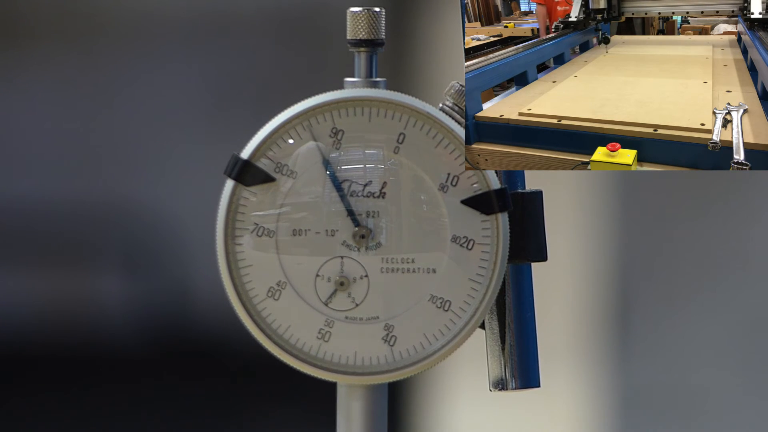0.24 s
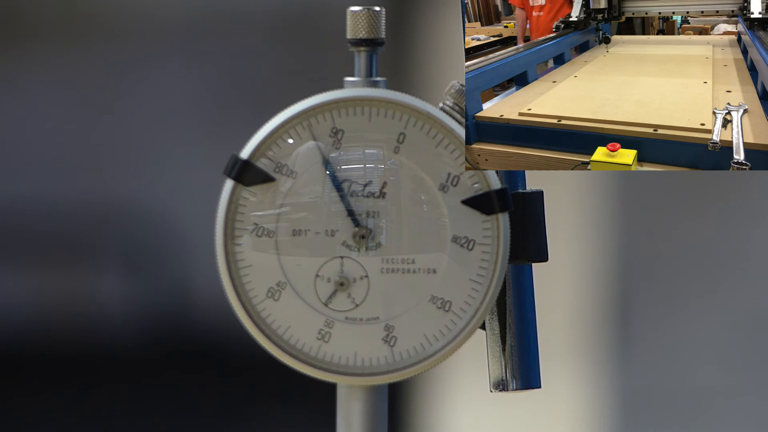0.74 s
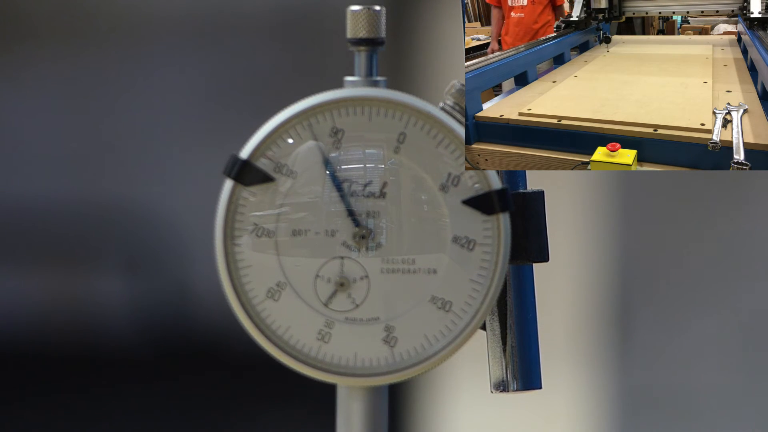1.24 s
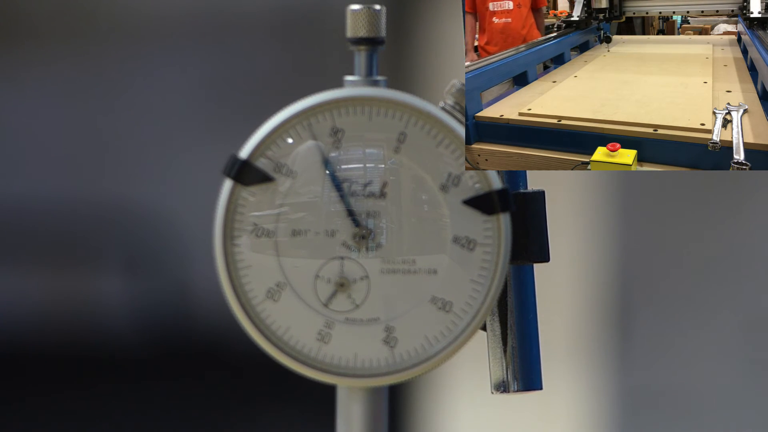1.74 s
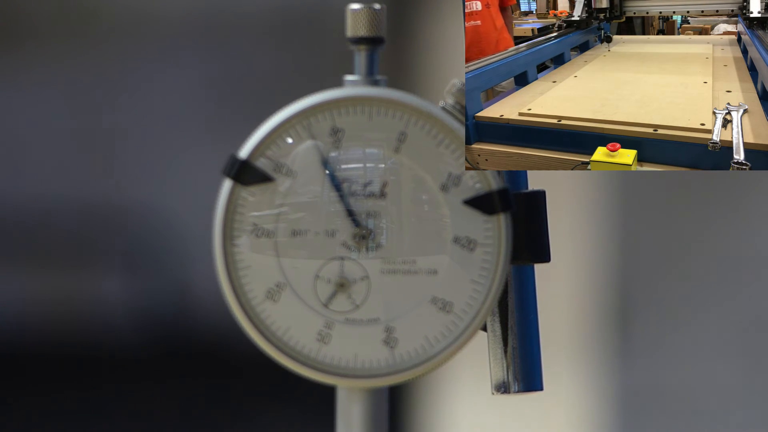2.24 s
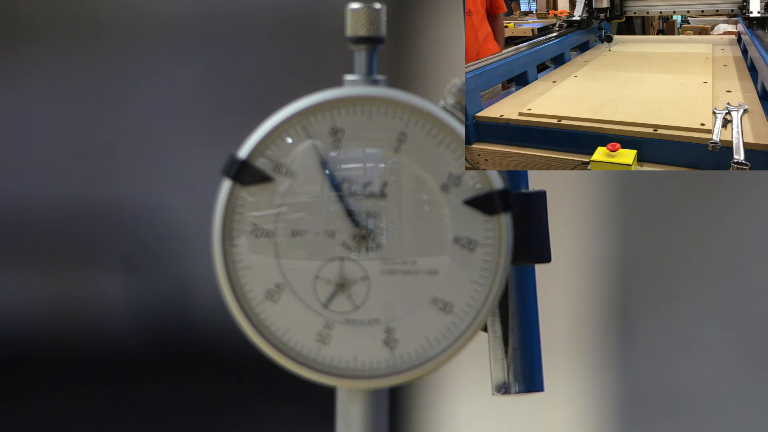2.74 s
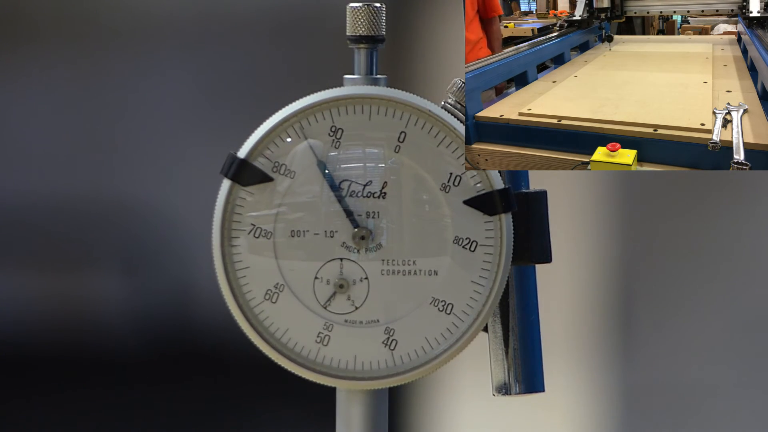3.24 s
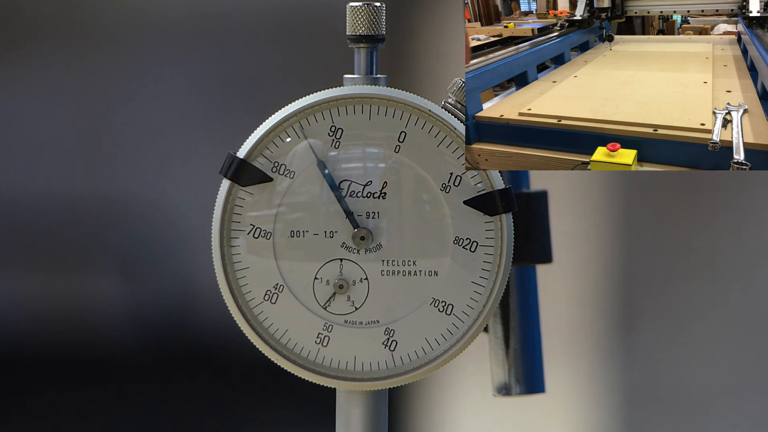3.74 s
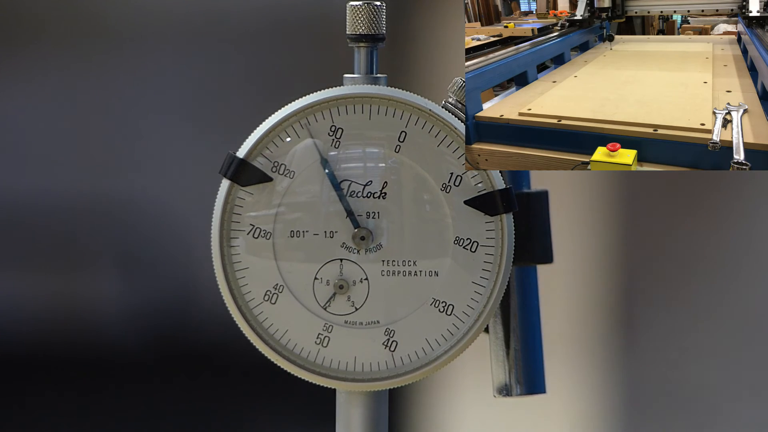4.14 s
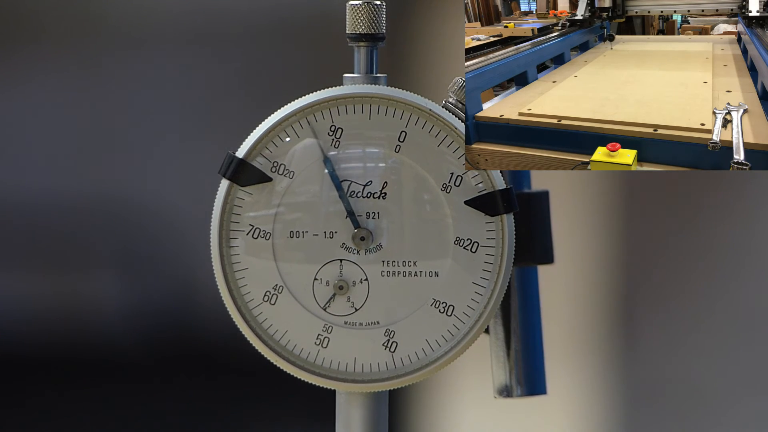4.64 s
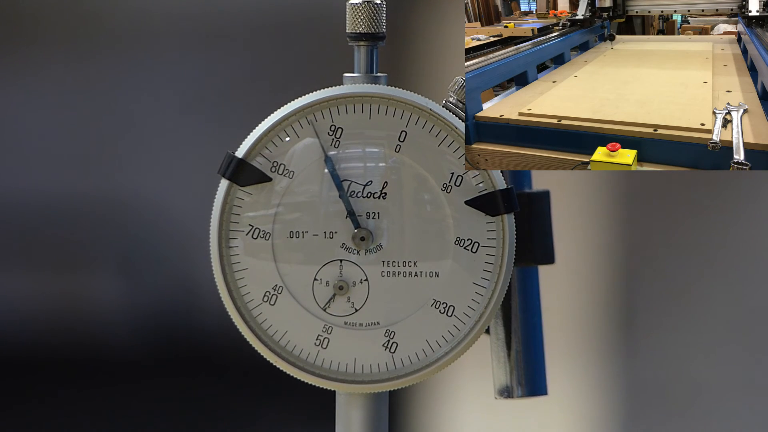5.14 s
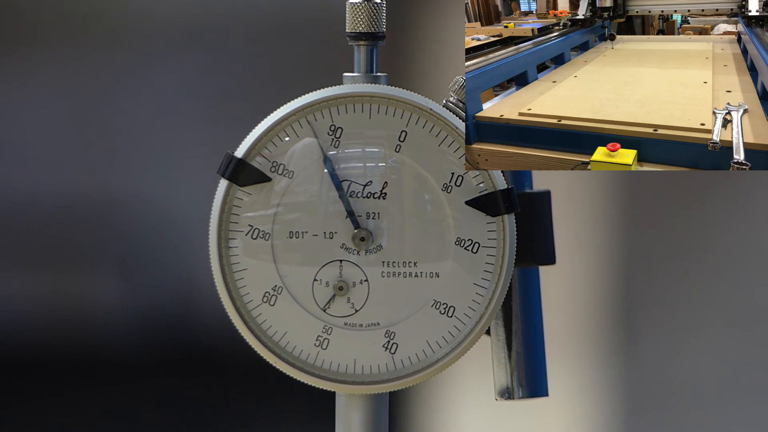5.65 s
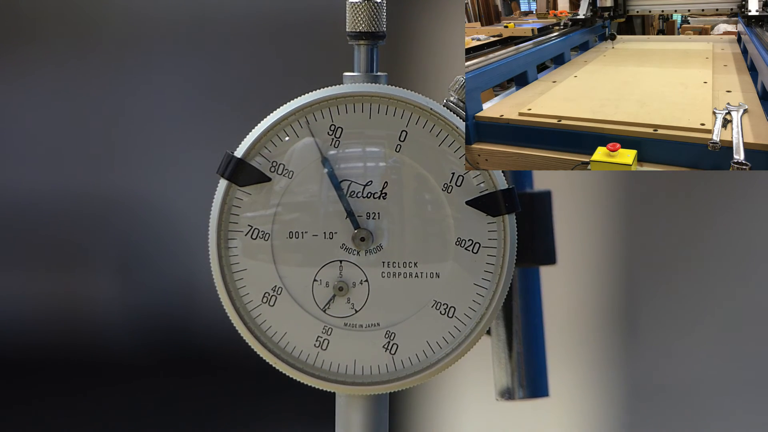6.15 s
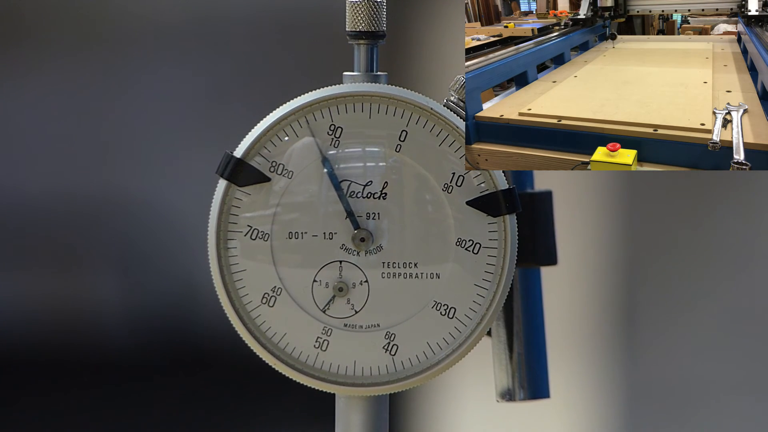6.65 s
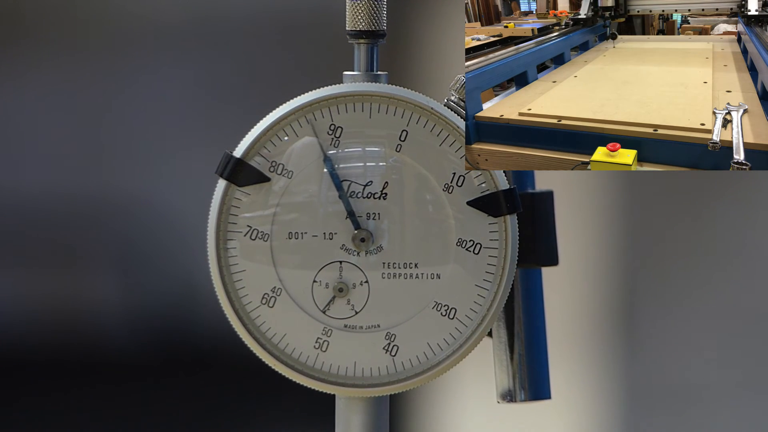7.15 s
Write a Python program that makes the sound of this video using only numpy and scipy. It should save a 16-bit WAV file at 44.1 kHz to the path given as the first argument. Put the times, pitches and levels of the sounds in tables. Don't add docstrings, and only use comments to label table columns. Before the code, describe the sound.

Close to a small camera microphone, electric drive motors hold a low, buzzing hum that throbs quickly and swells irregularly. Gear and belt whine and bearing rumble surround it. Soft ticks come early, then a tiny metal ping; later a second, higher motor tone fades in, and clearer dull ticks land near the end. Faint hiss and a very high thin whine sit mostly on the right.

```python
import sys
import numpy as np
from scipy import signal
from scipy.fft import rfft, irfft, next_fast_len
from scipy.io import wavfile
from scipy.ndimage import uniform_filter1d

SR = 44100
rng = np.random.default_rng(int(sys.argv[2]) if len(sys.argv) > 2 else 0)


def put_to_file(sound):
    columns = np.atleast_2d(sound).T
    safe = np.clip(columns, -1, 1)
    whole_steps = np.round(safe * 32767)
    wavfile.write(sys.argv[1], SR, whole_steps.astype(np.int16))


def decibels_to_gain(level_db):
    exponent = np.asarray(level_db, float) / 20
    return 10 ** exponent


N = 325899

# start_s [s], level_db [dB rms]
SECOND_DRIVE = [
    (3.6, -60),
    (4.05, -45),
    (4.5, -45),
    (4.9, -40),
    (5.6, -36),
    (6.1, -36.5),
    (6.6, -40.5),
    (7.0, -40.5),
    (7.39, -38.5),
]


def read(points, hz):
    f, value = np.transpose(points)
    return np.interp(np.log(hz + 1), np.log(f + 1), value)


def follow(rows):
    s, db = np.transpose(rows)
    return decibels_to_gain(np.interp(np.arange(N) / SR, s, db))


def coloured(gain, length):
    size = next_fast_len(length)
    spectrum = rfft(rng.standard_normal(size)) * gain(np.fft.rfftfreq(size, 1 / SR))
    return irfft(spectrum, size)[:length]


def drift(hz):
    x = coloured(lambda f: 1 / (1 + (f / hz) ** 2), N)
    return x / x.std()


def tone(hz, db, wander=0., waver_db=0.):
    phase = 2 * np.pi * (hz * np.arange(N) / SR + rng.random()) + wander * drift(hz=1.9)
    return np.sqrt(2) * decibels_to_gain(db + waver_db * drift(hz=0.41)) * np.cos(phase)


def motors():
    # start_s [s], level_db [dB rms]
    load_curve = [(0, -18), (.22, -17), (.55, -19.5), (1.0, -17.5), (1.25, -16.5), (1.75, -17), (2.2, -19),
                  (2.5, -19.5), (2.75, -15), (3.0, -18.5), (3.4, -19), (3.75, -21), (4.0, -16.5),
                  (4.6, -18.5), (5.2, -16), (5.45, -18.5), (6.5, -20), (7.39, -19.5)]
    # apart_hz [Hz], level_db [dB re order],
    # in_step_s [s], swell_share [share of the second drive's swell]
    fourth_beats = [(10.61, -19.5, .053, .3), (15.42, -24, .015, 0)]
    eighth_beats = [(-10.04, -3, .062, .25), (7.11, -7, .072, 0), (-5.28, -9.5, .088, 0),
                    (19.57, -15, .028, 0)]
    other_orders = [2, 3, 6, 7, 10, 12, 15, 16, 20]
    other_orders_db = [-51, -41, -50, -51, -54, -50, -59, -48, -63]
    shaft_hz = 42.557

    load = follow(load_curve)
    fourth = load * throbbing(4 * shaft_hz, fourth_beats, share=0.29, width_hz=25.8, smooth_s=0.16)
    eighth_gain = decibels_to_gain(-36) * (load / np.median(load)) ** 0.13
    eighth = eighth_gain * throbbing(8 * shaft_hz, eighth_beats, share=0.64, width_hz=29, smooth_s=0.24)
    steady = sum(tone(k * shaft_hz, db, wander=.1, waver_db=.8)
                 for k, db in zip(other_orders, other_orders_db))
    return fourth + eighth + steady


def throbbing(hz, beats, share, width_hz, smooth_s):
    t = np.arange(N) / SR
    ring = [coloured(lambda f: (1 + (2 * f / width_hz) ** 2) ** -1.05, N) for _ in range(2)]
    swing = 1 + share * (ring[0] + 1j * ring[1]) / np.std(ring)
    smooth = round(smooth_s * SR)
    power = uniform_filter1d(uniform_filter1d(abs(swing) ** 2, smooth), smooth)
    slow = np.sqrt(abs(power))
    second = follow(SECOND_DRIVE)
    swell = second / second.max()
    near = sum(decibels_to_gain(db) * swell ** part * np.exp(2j * np.pi * apart * (t - s))
               for apart, db, s, part in beats) / np.median(slow)
    return np.sqrt(2) * ((swing / slow + near) * np.exp(2j * np.pi * hz * t)).real


def second_drive():
    return follow(SECOND_DRIVE) * tone(427.98, 0., wander=.12, waver_db=0.8)


def gears():
    gear_pitches = [136.16, 492.25, 516.0, 525.47, 623.07, 670.63, 723.5, 758.5, 831.09, 844.0, 943.99,
                    964.1, 984.57, 1274.46, 2013.19, 2023.8]
    gear_levels = [-45, -52, -56, -55, -52, -56, -60, -54, -57, -66, -64, -57.5, -63, -65, -73, -72]
    return sum(tone(hz, db, wander=.2, waver_db=1.4) for hz, db in zip(gear_pitches, gear_levels))


def frame():
    # pitch_hz [Hz], level_db [dB per Hz]
    rumble = [(25, -67), (50, -56.5), (68, -61), (95, -48.5), (170, -50.5), (280, -50.5), (400, -55.5),
              (560, -59.5), (800, -63), (1100, -68), (2000, -69), (3900, -69.5), (4400, -75.5), (6500, -82),
              (14500, -86)]
    # pitch_hz [Hz], width_hz [Hz], level_db [dB per Hz at the top]
    resonances = [(131, 22, -51.5), (186.3, 47, -41), (224, 27, -51), (252, 18, -48), (308.6, 11.4, -43.5),
                  (344, 25, -69), (431.6, 36, -51.5), (498, 23, -55), (606, 40, -53), (667, 60, -55),
                  (748, 31, -55.5), (856, 40, -65), (974, 64, -61), (716, 16, -55.5), (486, 9.3, -50.5),
                  (2350, 23, -72), (1275, 340, -68), (3144, 320, -67.5), (3615, 26, -60), (3710, 360, -70)]

    def body(hz):
        peaks = sum(decibels_to_gain(db) ** 2 / (1 + (2 * (hz - f) / w) ** 2) ** 1.57 for f, w, db in resonances)
        return np.sqrt(decibels_to_gain(read(rumble, hz)) ** 2 + peaks) / (1 + (hz / 15100) ** 60)

    low = coloured(lambda hz: body(hz) / np.sqrt(1 + (hz / 900) ** 4), N)
    high = coloured(lambda hz: body(hz) / np.sqrt(1 + (900 / (hz + 1)) ** 4), N)
    sway_db = 0.31 * drift(hz=0.86)
    flicker_db = .5 * drift(hz=5.5) + 0.46 * drift(hz=25)
    return decibels_to_gain(32) * (low * decibels_to_gain(sway_db) + high * decibels_to_gain(flicker_db))


def ticks():
    # start_s [s], level_db [peak dB], pitch_hz [centre Hz],
    # rise_s [s], t60_s [s]
    rail_ticks = [(.85, -55, 7000, .008, .1), (1.07, -48.5, 5500, .008, .1),
                  (3.066, -47.5, 6500, .005, .12), (1.21, -41, 1000, .001, .06),
                  (4.325, -33.5, 1200, .005, .11), (4.35, -50, 7000, .02, .2), (4.39, -47, 3600, .02, .25),
                  (5.4, -31.5, 1250, .01, .18), (5.39, -49, 6000, .015, .2),
                  (7.143, -29.5, 1300, .001, .14), (7.149, -40, 3400, .003, .13),
                  (7.178, -38, 1300, .004, .22), (7.232, -39, 2600, .012, .18)]
    out, t = np.zeros(N + SR), np.arange(SR // 2) / SR
    for s, db, hz, rise, t60 in rail_ticks:
        def colour(f):
            climb = (f / hz) ** 3
            fall = decibels_to_gain(7.5 * np.log2((f + 1) / hz))
            return climb / (1 + climb * fall) * housing(f) / (1 + (f / 10000) ** 6)

        puff = coloured(colour, len(t))
        puff *= decibels_to_gain(1.3 * drift(hz=200)[:len(t)])
        envelope = decibels_to_gain(db - 60 * t / t60) * (1 - np.exp(-t / max(rise, 1e-4)))
        out[round(s * SR):][:len(t)] += puff / puff.std() * envelope
    return out[:N]


def housing(hz):
    return .45 + .55 / (1 + (hz / 4150) ** 16)


def ping():
    # pitch_hz [Hz], level_db [dB], t60_s [s]
    part_modes = [(2470, -32, .04), (2420, -43, .3), (2530, -41.5, .32), (2620, -44, .24), (2730, -43, .1),
                  (3720, -43, .12), (2290, -41, .06)]
    out, t = np.zeros(N + SR), np.arange(SR // 2) / SR
    ring = sum(decibels_to_gain(db - 60 * t / t60) * np.sin(2 * np.pi * hz * t) for hz, db, t60 in part_modes)
    walls = rng.standard_normal(len(t)) * decibels_to_gain(-40 - 60 * t / 0.18) * (t > .008)
    direct = ring * np.minimum(t / 0.00088, 1)
    out[round(1.548 * SR):][:len(t)] += direct + signal.fftconvolve(ring, walls)[:len(t)]
    return out[:N]


def preamp_hiss():
    # pitch_hz [Hz], level_db [dB per Hz]
    self_noise = [(30, -71), (90, -78), (250, -92), (1000, -99), (6000, -91.5), (15000, -93)]
    hiss = [coloured(lambda hz: decibels_to_gain(read(self_noise, hz) + 33.5), N) for _ in range(2)]
    return np.array(hiss) * decibels_to_gain(np.array([[-2.5], [1.8]]))


def line_whine():
    # left_db [dB rms], right_db [dB rms]
    leak_levels = [
        [-61, -47],
        [-93, -63],
    ]
    line_hz = 15734.27
    return decibels_to_gain(np.array(leak_levels)).T @ [tone(line_hz, 0., wander=.03), tone(line_hz / 2, 0.)]


def scene():
    machine = motors() + second_drive() + gears() + frame() + ticks() + ping()
    bass = 1 / (1 + (np.fft.rfftfreq(N, 1 / SR) / 215) ** 8)
    lean = irfft(rfft(machine) * bass, N)
    return machine + decibels_to_gain(-30) * lean * np.array([[-1], [1]])


def low_pass(x):
    return signal.sosfilt(signal.butter(12, 15745, fs=SR, output="sos"), x)


def record(dry):
    mix = dry + preamp_hiss() + line_whine()
    return low_pass(mix)


dry = scene()
out = record(dry)
put_to_file(out)
```